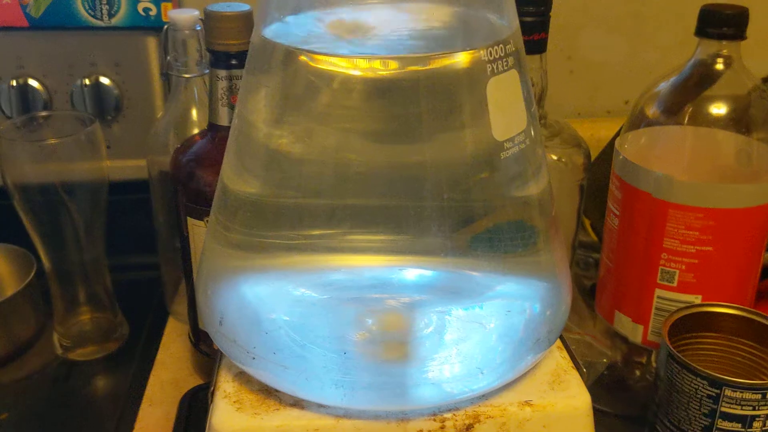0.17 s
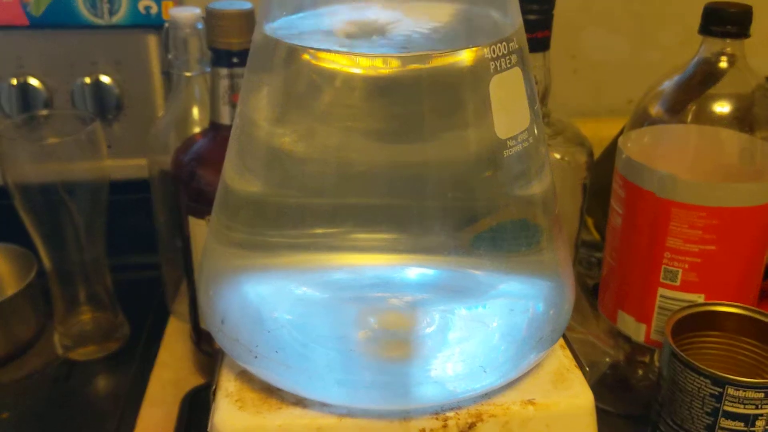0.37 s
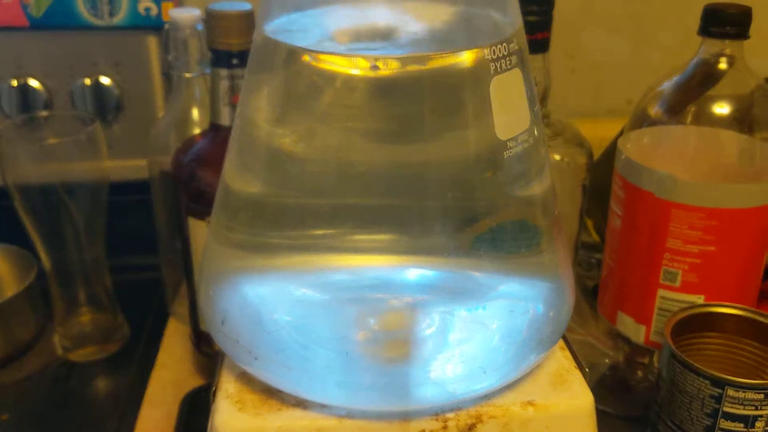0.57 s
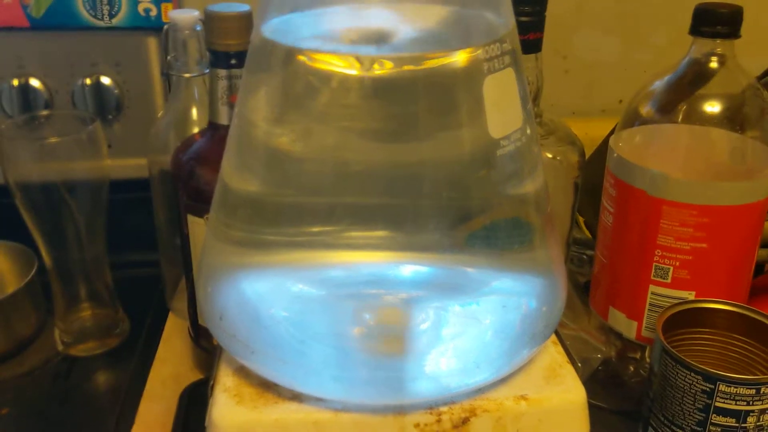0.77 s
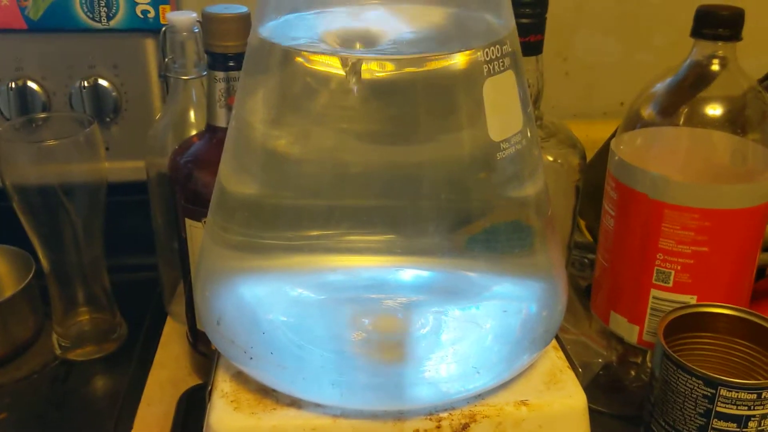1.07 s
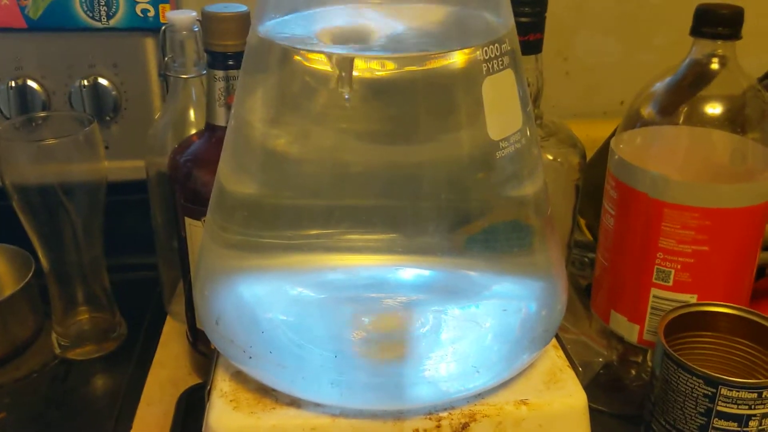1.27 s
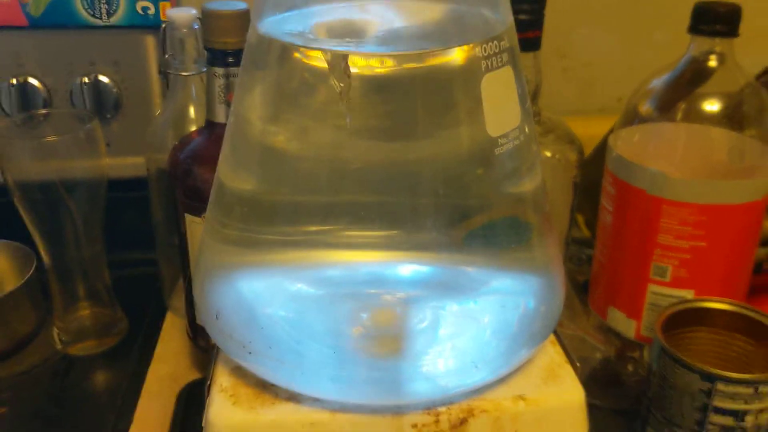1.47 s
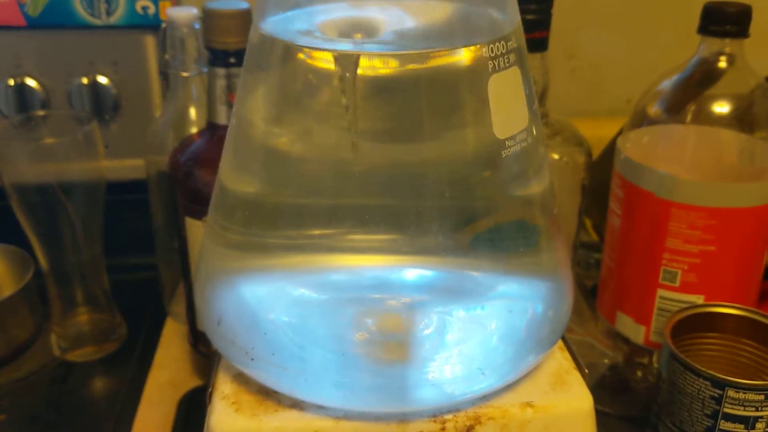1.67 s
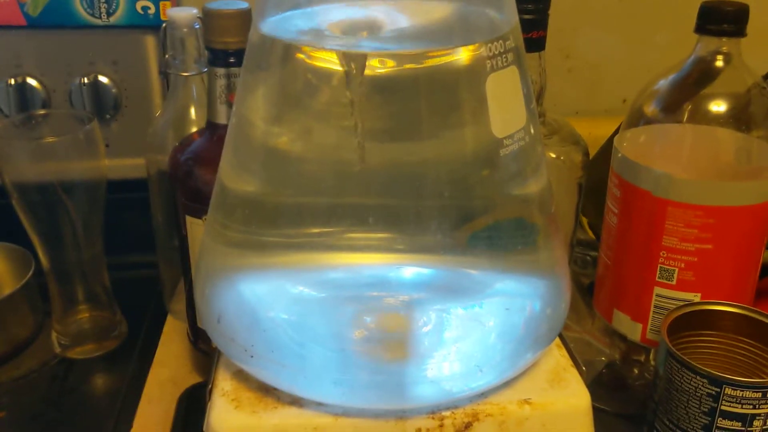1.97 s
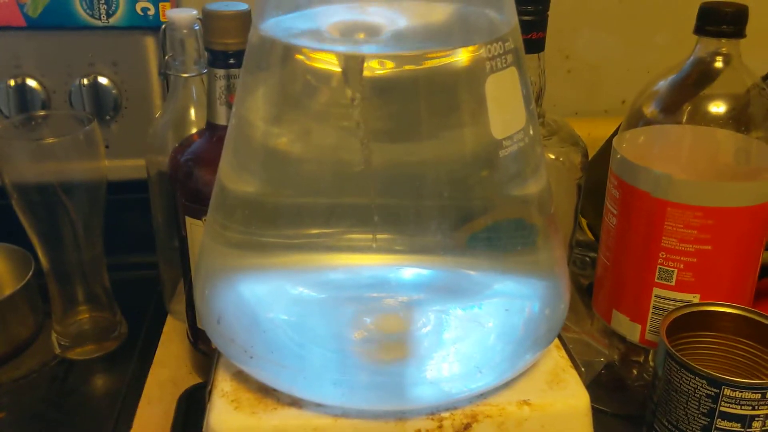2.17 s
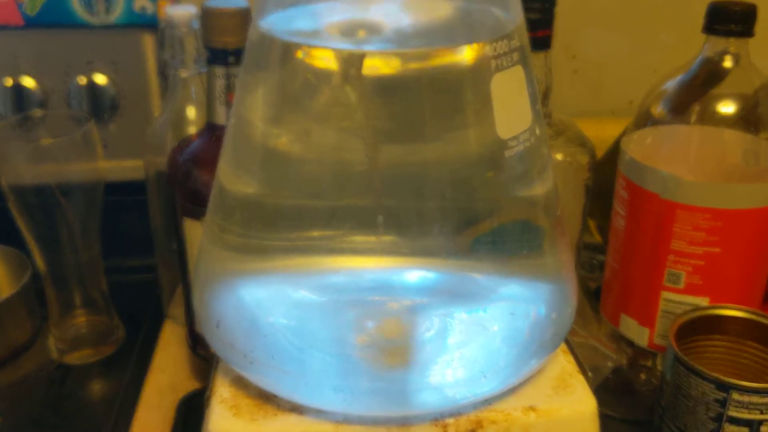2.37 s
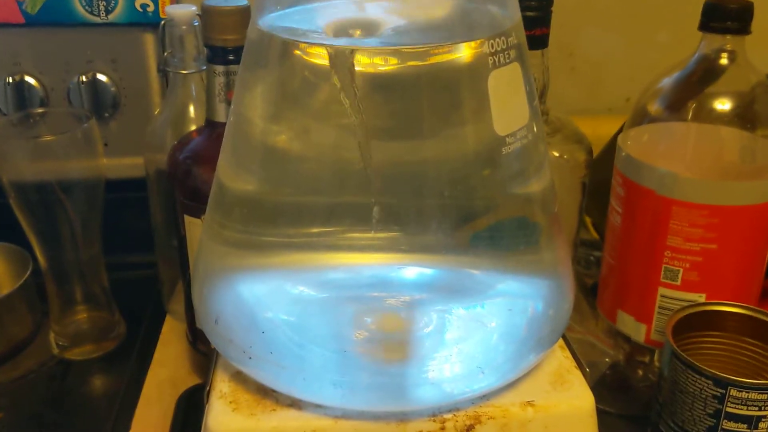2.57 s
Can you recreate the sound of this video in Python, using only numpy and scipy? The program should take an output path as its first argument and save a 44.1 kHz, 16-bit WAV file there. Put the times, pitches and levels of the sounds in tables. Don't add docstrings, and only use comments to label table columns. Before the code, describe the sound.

A spinning stir bar rattles about twenty times a second in a large water-filled glass flask, with ringing plate buzz, stray knocks, rough motor hum and hiss, heard close in a small kitchen with a hand-held microphone.

```python
import sys
import numpy as np
from scipy import signal
from scipy.fft import rfft, irfft, next_fast_len
from scipy.io import wavfile
from scipy.ndimage import uniform_filter1d, map_coordinates

SR = 44100
rng = np.random.default_rng(int(sys.argv[2]) if len(sys.argv) > 2 else 0)


def to_linear_factor(level_db):
    exponent = np.asarray(level_db, float) / 20
    return 10 ** exponent


def put_to_file(sound):
    columns = np.atleast_2d(sound).T
    safe = np.clip(columns, -1, 1)
    whole_steps = np.round(safe * 32767)
    wavfile.write(sys.argv[1], SR, whole_steps.astype(np.int16))


N = 119511


def unit(x):
    return x / np.sqrt(np.mean(x ** 2) + 1e-20)


def along(points, hz):
    f, v = np.transpose(points)
    return np.interp(np.log(hz + 1), np.log(f + 1), v)


def wobble(rate_hz):
    knots = rng.standard_normal(int(N * rate_hz / SR) + 4)
    return map_coordinates(knots, [np.arange(N) * rate_hz / SR])


def filtered(x, response):
    m = next_fast_len(N + SR // 4)
    return irfft(rfft(x, m) * response(np.fft.rfftfreq(m, 1 / SR)), m)[..., :N]


def body(modes_hz, modes):
    def response(f):
        total = 0
        for k, (c, (width_hz, left_db, right_db, lag_rad)) in enumerate(zip(modes_hz, modes)):
            ports = to_linear_factor([[left_db], [right_db]]) * np.exp([[0], [-1j * lag_rad]])
            damping = 1j * f * width_hz
            total = total + (-1) ** k * ports * damping / (c * c - f * f + damping)
        return total / (1 + 1j * f / modes_hz[-1]) ** 2
    return response


def pair(spectrum, alike, apart_hz=3000):
    def colour(hz):
        return to_linear_factor(along(spectrum, hz)) * (hz > spectrum[0][0] / 2)

    def turn(hz):
        return np.arccos(np.clip(alike, -1, 1) / (1 + (hz / apart_hz) ** 2)) / 2

    mid, side = filtered(rng.standard_normal((2, N)), colour)
    mid = filtered(mid, lambda hz: np.cos(turn(hz)))
    side = filtered(side, lambda hz: np.sin(turn(hz)))
    return unit(np.array([mid + side, mid - side]))


def chatter(times_s, levels_db, swell_s, t60_s, draw):
    first = np.arange(draw.shape[2]) == 0
    lag_s = 0.045 * draw[:, 0] * ~first
    scatter_db = 4.5 * (2 * draw[:, 1] - 1)
    size = to_linear_factor(8.5 * first - 60 * lag_s / t60_s + scatter_db)
    size = size * (1 - np.exp(-(lag_s + 0.0011) / swell_s))
    size = -to_linear_factor(levels_db)[:, None] * size / np.linalg.norm(size, axis=1, keepdims=True)
    at = np.minimum(np.round((times_s[:, None] + lag_s) * SR).astype(int), N)
    return np.bincount(at.ravel(), size.ravel(), N + 1)[:N]


# [t/s, glass level/dB, plate level over glass/dB]
CONTACTS = [(0.0788, -52, 2), (0.109, -56, 9.5), (0.122, -42, 0), (0.1761, -39, -0.5),
            (0.2195, -46.5, 6.5), (0.2707, -49, 6), (0.3051, -42, 1.5), (0.3466, -38, 1.5),
            (0.4184, -52.5, -3), (0.4607, -69, 2), (0.4987, -39.5, -4), (0.5263, -49, 5),
            (0.5449, -40.5, -2.5), (0.5953, -42, 2), (0.6448, -47, 0.5), (0.6849, -37, -2.5),
            (0.6992, -38, 0.5), (0.7603, -38, 2), (0.83, -44, -1.5), (0.8853, -49.5, -4),
            (0.9146, -40.5, -4), (0.9491, -39.5, 3.5), (1.0016, -39.5, 1.5), (1.0715, -47, -7),
            (1.1123, -40, 0.5), (1.144, -41.5, -1), (1.1862, -38.5, 2), (1.2379, -41, 2),
            (1.3096, -47.5, -4), (1.3498, -46.5, 4.5),
            (1.392, -37.5, -0.56), (1.442, -41.5, -1.2), (1.494, -46, -1.4), (1.5789, -38, 0.67),
                 (1.6093, -40, -0.32), (1.6298, -41, -1.3), (1.6791, -41, -0.36), (1.7303, -60, -1),
                 (1.767, -44, -1), (1.8126, -37, -0.4), (1.8626, -41.5, -1.2), (1.9192, -56, -1.2),
                 (1.9528, -40, -0.71), (1.9979, -37.5, -0.52), (2.0299, -39.5, -0.86),
                 (2.0501, -40.5, -1.3), (2.1015, -44, -1.8), (2.1938, -46, -1.2), (2.235, -38, -0.067),
                 (2.2841, -44, -0.39), (2.3234, -42, -0.73), (2.403, -42, -0.69), (2.415, -40, -0.71),
                 (2.4465, -37.5, -1), (2.501, -39.5, -1.1), (2.5739, -45.5, -0.68), (2.6104, -51.5, -0.79),
                 (2.6321, -51, -0.71), (2.65, -39.5, -0.66), (2.6846, -43, -0.48)]
# [t/s, level/dB]
KNOCKS = [(0.1259, -43), (0.3603, -38.5), (0.3631, -40), (0.5567, -39), (0.7044, -43.5), (0.7296, -35.5),
          (0.9172, -41), (0.9201, -45), (0.9453, -49), (0.9523, -45), (1.1545, -37), (1.2078, -39),
          (1.3956, -41), (1.5828, -45), (1.6024, -38.5), (1.6297, -35), (1.6328, -37), (1.8161, -39.5),
          (1.958, -45), (2.0375, -46), (2.251, -39), (2.4186, -43.5)]


def contacts():
    s, glass_db, plate_db = np.transpose(CONTACTS)
    draw = rng.random((60, 2, 26))[:len(s)]
    knock_s, knock_db = np.transpose(KNOCKS)
    knocks = -np.bincount(np.round(knock_s * SR).astype(int), to_linear_factor(knock_db - 6), N)
    on_glass = chatter(s, glass_db, swell_s=0.00094, t60_s=0.25, draw=draw) + knocks
    snap_s, spike_db = 0.0014, -7
    power = signal.lfilter([1], [1, -np.exp(-1 / (snap_s * SR))], on_glass ** 2)
    puffs = np.sqrt(abs(power)) * pair([(12, 0)], 0.38, 5000)
    on_plate = chatter(s, glass_db + plate_db, swell_s=0.0018, t60_s=0.12, draw=draw) + knocks
    return on_plate, on_glass, unit(puffs) + to_linear_factor(spike_db) * unit(on_glass)


def excited(taps, response, tap_db, rub_db):
    rub = to_linear_factor(11.9 * wobble(40.09)) * rng.standard_normal(taps.shape)
    return to_linear_factor(tap_db) * unit(filtered(taps, response)) + to_linear_factor(rub_db) * unit(filtered(rub, response))


PLATE_LOW_HZ = [870, 922, 1010, 1292, 1343]
PLATE_HIGH_HZ = [1685, 1747, 1870, 1946, 2140, 2261]
# [width/Hz, left level/dB, right level/dB, right lag/rad]
PLATE_LOW_MODES = [(62, -14.5, -6.5, 0.52), (37.8, -19.5, 1, 0.2), (39, -9, -2, 0.95),
                   (30, -14, -15.5, 1.5), (30.2, -7, -10, 0.64)]
PLATE_HIGH_MODES = [(62.4, -9, -10, 0.2), (34.8, -7, -5.5, 0.25), (51, -13.5, -11.5, 0.53),
                    (50, -14, -9.5, 0.57), (18.6, -5.5, -10, 0.37), (23.7, -11, -8.5, 1.87)]


def plate(taps):
    low = excited(taps, body(PLATE_LOW_HZ, PLATE_LOW_MODES), tap_db=-55.5, rub_db=-76)
    high = excited(taps, body(PLATE_HIGH_HZ, PLATE_HIGH_MODES), tap_db=-53.5, rub_db=-61.5)
    return low + high


FLASK_HZ = [2715, 3125, 3196, 3378, 3575, 3853, 4066, 4817, 5092, 5760, 7300, 7606, 7980, 9750]
# [width/Hz, left level/dB, right level/dB, right lag/rad]
FLASK_MODES = [(38, -10, -18, 1.4), (61.3, -6, 1.5, 0.14), (27.8, 3.5, 6, 1.32), (30.6, -11, -2.5, 0.97),
               (30.2, -7, 0, 1.1), (40, -9, -10, 1.57), (24.7, -27, -11.5, 0.69), (25.7, -13, -12, 0.14),
               (60.3, -26, -16, 2.85), (220, -22, -18.5, 2.5), (200, -18, -18.5, 1.21), (70, -18, -12.5, 2),
               (49.4, -18, -20.5, 1.4), (590, -28.5, -26.5, 2.24)]


def flask(taps):
    return excited(taps, body(FLASK_HZ, FLASK_MODES), tap_db=-52.5, rub_db=-72.5)


# [f/Hz, left level/dB, right level/dB]
CLICK = [(151, -22, -32), (490, -4.5, -22.5), (1260, -4.5, 1), (1890, 5.5, -4), (4820, -21, -3),
         (6000, -40, -24), (8830, -27.5, -35), (14300, -32.5, -37)]


def click(snaps):
    hz, *sides = np.transpose(CLICK)

    def response(f):
        return to_linear_factor([np.interp(np.log(f + 1), np.log(hz), side_db) for side_db in sides])

    return excited(snaps, response, tap_db=-53.5, rub_db=-65)


def bar():
    on_plate, on_glass, snaps = contacts()
    rattle = plate(on_plate) + flask(on_glass) + click(snaps)
    effort = unit(np.sqrt(abs(uniform_filter1d(on_glass ** 2, size=3500))))
    return rattle, effort


# [peak t/s, high ring level/dB, high ring f/Hz, low level over high/dB]
RINGS = [(0.094, -54.5, 1775, -0.5), (0.128, -41.5, 1722, -8.5), (0.2, -37, 1752, -19),
         (0.238, -42, 1784, -8), (0.276, -45, 1704, -11), (0.315, -49.5, 1754, 4),
         (0.352, -39, 1770, -4), (0.378, -49, 1650, -4), (0.429, -51, 1680, 1),
         (0.469, -49, 1750, -4), (0.505, -48.5, 1725, 1), (0.532, -38.5, 1746, -7),
         (0.614, -44.5, 1744, -3.5), (0.652, -39.5, 1737, -15), (0.706, -31, 1738, -11.5),
         (0.777, -39.5, 1694, -13), (0.803, -52, 1630, -6), (0.839, -40.5, 1712, -16),
         (0.888, -48.5, 1764, -12), (0.907, -42.5, 1664, -6), (0.932, -40, 1767, -9),
         (0.954, -38.5, 1740, -3.5), (1.011, -34, 1739, -8), (1.075, -46.5, 1780, -3),
         (1.132, -43, 1733, -16), (1.149, -34.5, 1713, -18), (1.171, -48, 1830, -2),
         (1.212, -36, 1743, -15.5), (1.26, -44, 1727, -25), (1.316, -40.5, 1686, -7),
         (1.364, -41, 1736, -12), (1.407, -42, 1750, -6), (1.457, -42, 1700, -19),
              (1.502, -42.5, 1738, -10), (1.598, -39, 1730, -18), (1.625, -38, 1683, -7),
              (1.649, -52, 1720, -7), (1.696, -41.5, 1701, -7), (1.738, -41.5, 1760, -8.5),
              (1.776, -49, 1780, 1), (1.805, -50, 1730, -4), (1.874, -59.5, 1800, 6),
              (1.927, -47.5, 1690, -2.5), (1.972, -34.5, 1742, -23), (1.989, -42, 1680, -4),
              (2.014, -55, 1745, -16), (2.038, -49, 1690, -22), (2.055, -52, 1722, -4),
              (2.109, -56, 1630, 7), (2.208, -48, 1736, -19), (2.253, -45, 1740, 0), (2.272, -51, 1670, 1),
              (2.292, -46.5, 1673, -6), (2.338, -42, 1650, -21), (2.42, -46.5, 1630, 2.5),
              (2.461, -54.5, 1730, 7.5), (2.517, -49, 1680, 2), (2.58, -44, 1645, -5),
              (2.638, -52, 1650, -3), (2.657, -49.5, 1620, 8)]


def rings():
    s, high_db, high_hz, low_over_db = np.transpose(RINGS)[..., None]
    rise_s, fall_s, glide_hz_per_s, rough_rad = 0.0049, 0.0093, 2070, 0.43
    draw = rng.random((len(s), 4))
    t = np.arange(-SR // 40, SR // 16) / SR
    swell = np.where(t < 0, np.exp(-(t / rise_s) ** 2 / 2), 1 / np.cosh(t / fall_s) ** 2)
    at = np.round(s * SR).astype(int) + np.arange(len(t)) - SR // 40
    at = np.clip(at, 0, N - 1).ravel()
    low_db = high_db + low_over_db - 4
    partner_db = low_db - 3 + 6 * (2 * draw[:, -1:] - 1)
    # f/Hz, level/dB, left over right/dB, right lag/rad
    voices = [(high_hz, high_db - 1.5, 0.3, 0.4),
              (911.6, low_db, -11.5, 0.43),
              (1004, partner_db, -4, 0.86)]
    out = np.zeros((2, N))
    for k, (hz, level_db, pan_db, lag_rad) in enumerate(voices):
        cycles = hz * t + glide_hz_per_s * t * t / 2 + draw[:, k:k + 1]
        phase = 2 * np.pi * cycles + rough_rad * wobble(70)[at].reshape(len(s), -1)
        for port, side in enumerate((1, -1)):
            wave = to_linear_factor(level_db) * swell * np.sin(phase + side * lag_rad / 2)
            out[port] += to_linear_factor(side * pan_db / 2) * np.bincount(at, wave.ravel(), N)
    return out


# [f/Hz, t60/s]
ROOM = [(300, 0.095), (2000, 0.25), (8000, 0.35)]


def room(x):
    hz, _, z = signal.stft(rng.standard_normal((2, SR // 3)), SR, nperseg=256)
    t = _
    decay = to_linear_factor(-60 * t / along(ROOM, hz)[:, None])
    tail = signal.istft(z * decay, SR, nperseg=256)[1]
    delayed = np.pad(x, ((0, 0), (130, 0)))
    return signal.fftconvolve(delayed, tail / np.linalg.norm(tail[0]), axes=1)[:, :N]


MOTOR_HZ = [221, 248, 368, 560]
# [width/Hz, left level/dB, right level/dB, right lag/rad]
MOTOR_MODES = [(11.4, -9.5, -8, 0.22), (9.8, -9, -5, 0.29), (14.6, -2, 0, 0.93), (138, -7, -6.5, 2.12)]


def motor(effort):
    drive = rng.standard_normal(N) * (1 + 0.81 * effort)
    return to_linear_factor(-59.5) * unit(filtered(drive, body(MOTOR_HZ, MOTOR_MODES)))


# [t/s, level/dB, f/Hz, left over right/dB]
NUDGES = [
    (1.431, -43, 91, 6),
    (1.517, -52.5, 220, 28),
    (1.596, -38, 383, 6),
    (2.388, -43, 215, 4),
    (2.4, -41, 42.5, 7),
]


def nudges():
    rise_s, t60_s = 0.0037, 0.053
    out = np.zeros((2, N + SR))
    t = np.arange(SR // 8) / SR
    for s, db, hz, tilt_db in NUDGES:
        bump = to_linear_factor(db - 60 * t / t60_s) * np.sin(2 * np.pi * hz * t) * (1 - np.exp(-t / rise_s))
        out[:, round(s * SR):][:, :len(t)] += to_linear_factor([[tilt_db / 2], [-tilt_db / 2]]) * bump
    return out[:, :N]


# [f/Hz, level/dB]
RUMBLE = [(15, 1), (30, 6.5), (45, -2.5), (65, -5.5), (90, -10.5), (150, -11.5), (400, -57), (900, -120)]


def rumble():
    rise_s, sway_db = 0.22, 2
    level = to_linear_factor(-64.5 + sway_db * wobble(5.48))
    return level * pair(RUMBLE, 0.79) * np.clip(np.arange(N) / SR / rise_s, 0, 1) ** 2


# [f/Hz, level/dB per Hz]
HISS = [(70, -4), (150, 0), (400, 3), (700, 2), (1500, -1.5), (4000, -3), (8000, -12), (15000, -26.5)]


def hiss():
    return to_linear_factor(-60.5) * pair(HISS, 0.31)


def scene():
    rattle, effort = bar()
    rattle = rattle + rings()
    return rattle + to_linear_factor(-5) * room(rattle) + motor(effort) + hiss() + nudges() + rumble()


def roll_off(x):
    return signal.sosfilt(signal.butter(12, 16160, fs=SR, output="sos"), x)


def record(dry):
    start_s, fade_s, top_hz = 0.071, 0.018, 15750
    fade = np.clip((np.arange(N) / SR - start_s) / fade_s, 0, 1)
    mix = filtered(dry, lambda hz: hz < top_hz) * fade
    return roll_off(mix)


dry = scene()
out = record(dry)
put_to_file(out)
```